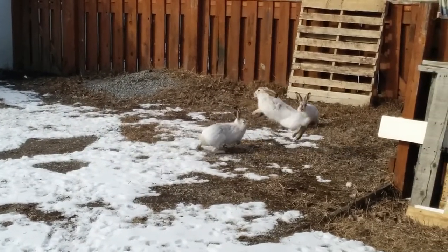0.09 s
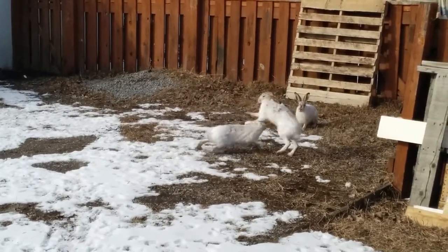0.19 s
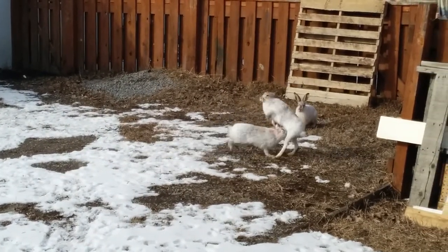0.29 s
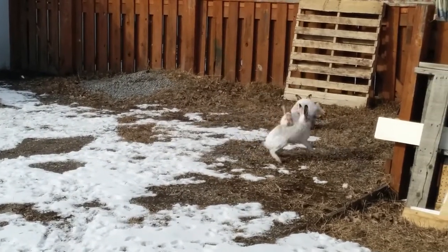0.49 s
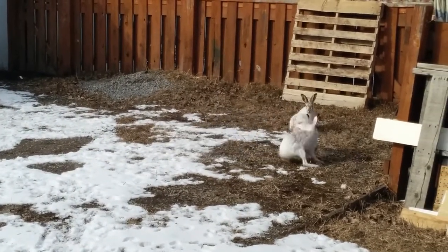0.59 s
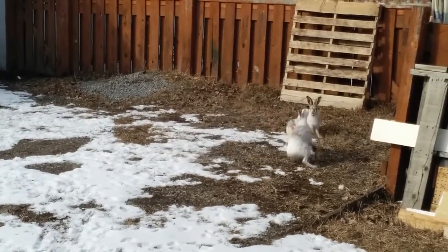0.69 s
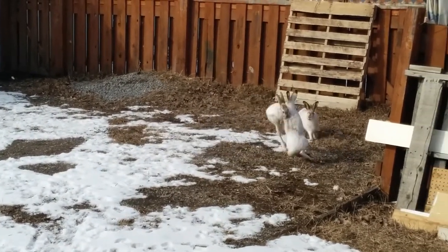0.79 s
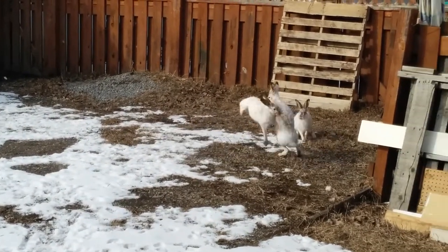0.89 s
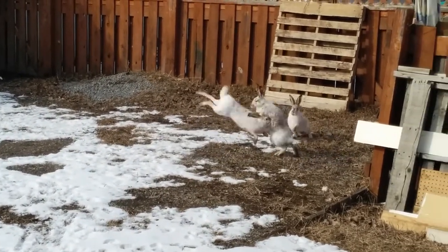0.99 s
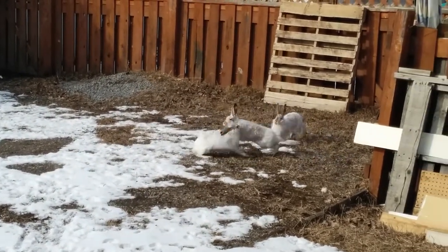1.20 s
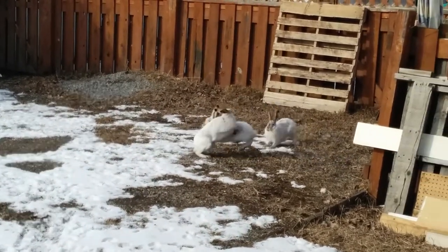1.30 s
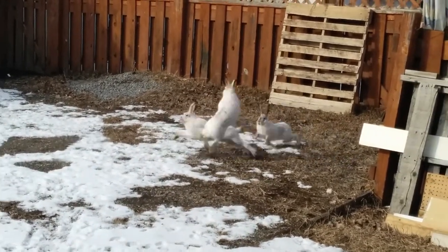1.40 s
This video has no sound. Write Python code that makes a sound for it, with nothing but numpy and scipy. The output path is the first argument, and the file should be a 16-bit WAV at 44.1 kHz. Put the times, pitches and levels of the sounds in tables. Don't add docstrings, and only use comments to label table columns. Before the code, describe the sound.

Short raspy animal grunts from fighting hares, with soft landing thumps and claw scuffs outdoors

```python
import sys
import numpy as np
from scipy import signal
from scipy.io import wavfile
from scipy.ndimage import uniform_filter1d

SR = 44100
rng = np.random.default_rng(int(sys.argv[2]) if len(sys.argv) > 2 else 0)


def ratio_of_db(decibels):
    return 10 ** (np.asarray(decibels, float) / 20)


def generate_wav(sig):
    pcm = np.round(np.clip(np.atleast_2d(sig).T, -1, 1) * 32767).astype(np.int16)
    wavfile.write(sys.argv[1], SR, pcm)


N = 63945


def evened(x):
    return x / np.sqrt(np.mean(x ** 2) + 1e-20)


def add(mix, s, sound):
    part = mix[max(round(s * SR), 0):][:len(sound)]
    part += sound[:len(part)]


def resonate(x, hz, width):
    turn = np.exp(2j * np.pi * hz * np.arange(len(x)) / SR)
    r = np.exp(-1.4 * np.pi * width / SR)
    low = x / turn
    for _ in range(3):
        low = signal.lfilter([1 - r], [1, -r], low)
    return 2 * (turn * low).real


def hush():
    # frequency in Hz, level in dB per Hz.
    air_spectrum = [(35, -34.5), (60, 4.5), (674, -3.5), (812, -0.5), (1290, -17), (3130, -16.5),
                    (4640, -28.5), (7570, -22), (15600, -24.5)]
    level_db, patch_db = -67, 1.5
    frames, hz = N // 256 + 5, np.fft.rfftfreq(1024, 1 / SR)
    a, b, patches = rng.standard_normal((frames, 513, 3)).T
    patches = uniform_filter1d(patches, 12, 0)
    patches = evened(uniform_filter1d(patches, 10, 1))
    f, db = np.transpose(air_spectrum)
    colour_db = np.interp(np.log(hz + 1), np.log(f + 1), db, left=-30)
    z = (a + 1j * b) * ratio_of_db(colour_db[:, None] + patch_db * patches)
    air = signal.istft(z, nperseg=1024, noverlap=768)[1][:N]
    return ratio_of_db(level_db) * evened(air)


def fence(x):
    t60, first_return_s, top_hz = 0.12, 0.008, 5100
    t = np.arange(8000) / SR
    taps = rng.standard_normal(8000) * ratio_of_db(-60 * t / t60) * (t > first_return_s)
    taps = signal.lfilter(*signal.butter(2, top_hz, fs=SR), taps)
    return signal.fftconvolve(x, taps / np.linalg.norm(taps))[:N]


def thumps():
    # start in seconds, peak level in dB, frequency in Hz.
    landings = [(0.0, -43, 126), (0.024, -41.5, 120), (0.042, -38.5, 180), (0.053, -34, 147),
                (0.08, -43, 110), (0.092, -45, 80), (0.21, -37.5, 71), (0.43, -47, 78), (0.663, -58, 69),
                (1.083, -53, 68.5), (1.191, -50.5, 68.6), (1.419, -67.5, 62.4)]
    decay_cycles = 0.43
    out, t = np.zeros(N), np.arange(0, .15, 1 / SR)
    for s, db, hz in landings:
        age = t * hz / decay_cycles
        push = np.e * age * np.exp(-age)
        add(out, s, ratio_of_db(db) * push * np.sin(2 * np.pi * hz * t))
    return out


def scuffs():
    # start in seconds, length in seconds, level in
    # dB, centre in Hz, width in Hz.
    scrapes = [(0.159, 0.016, -62, 1600, 900), (0.043, 0.009, -66, 2740, 400),
               (0.05, 0.035, -75, 2950, 250), (0.1, 0.022, -67, 560, 300), (0.715, 0.03, -59, 500, 600),
               (0.764, 0.13, -65, 346, 486), (0.788, 0.02, -63, 2400, 1000), (0.8, 0.09, -65, 2300, 1100),
               (0.955, 0.022, -58, 4750, 500), (0.9815, 0.0018, -53, 7550, 3500),
               (0.983, 0.012, -59, 1150, 500), (1.149, 0.0027, -62.5, 9200, 5000),
               (1.184, 0.004, -58, 7000, 3000), (1.208, 0.025, -52, 620, 450), (1.23, 0.02, -66, 750, 400),
               (1.269, 0.01, -72, 3100, 500), (1.34, 0.016, -73, 2560, 300)]
    out = np.zeros(N)
    for s, length, db, hz, width in scrapes:
        n = round(length * SR)
        grain_levels = ratio_of_db(2.5 * rng.standard_normal(60)).repeat(100)
        grains = (rng.standard_normal(6000) * grain_levels)[:n]
        add(out, s, ratio_of_db(db) * np.hanning(n) ** .5 * evened(resonate(grains, hz, width)))
    return out


def throat_rings(throat, snaps, puffs, voiced, breath, breath_top, lower_top_hz):
    puff_share, upper_hz = .22, 3900
    scatter, shimmer_db, lag_s = 1.7 * breath_top, min(4.5 * breath_top, 2), .0007
    cycle = np.cumsum(snaps > 0)
    air = voiced * puff_share * puffs + breath * rng.standard_normal(len(snaps))
    lower, upper = np.zeros((2, len(snaps)))
    for k, (hz, width, db) in enumerate(throat):
        uneven = rng.standard_normal(200)
        strike = np.sqrt(2) * voiced * snaps * np.exp(1j * scatter * uneven[cycle])
        strike = strike * ratio_of_db(shimmer_db * uneven[-1 - cycle])
        snap_share = 1 - puff_share * (1 + 2 * (hz > upper_hz))
        ring = ratio_of_db(db) * resonate(snap_share * strike + air, hz, max(width, 50))
        add(lower if hz < lower_top_hz else upper, lag_s * (k % 3), ring)
    return evened(lower), evened(upper)


def chest_hum(turns, late, hz, breath_top):
    waver_db, second_db, blur_hz = 5, -10, 178
    waver = ratio_of_db(waver_db * breath_top * np.interp(turns / 2, np.arange(200), rng.standard_normal(200)))
    second = ratio_of_db(second_db) * (1 - breath_top) ** 2 * 1.2
    tone = np.sin(2 * np.pi * late) + second * np.sin(4 * np.pi * late)
    tone = np.sqrt(2) * waver * tone
    blur = breath_top ** 1.6
    noise = evened(resonate(rng.standard_normal(len(late)), hz, blur_hz))
    return np.sqrt(1 - blur ** 2) * tone + blur * noise


def grunt(curve, throat, breath_top, gruff_db, lower_top_hz=3900):
    jitter, shimmer_db, puff_cycle = .02, 1.2, .25
    breath_per_db, fade_s = .055, 0.0046
    s, hum_db, hz, rasp_db, open_db = np.transpose(curve)
    t = np.arange(s[0], s[-1], 1 / SR)

    turns = np.cumsum(np.interp(t, s, hz)) / SR
    late = turns + jitter * np.interp(turns, np.arange(200), rng.standard_normal(200))
    cycle = np.floor(np.maximum.accumulate(np.abs(late))).astype(int)
    snaps = evened(np.diff(cycle, prepend=0))
    puffs = evened(np.exp(-(late % 1) / puff_cycle) * rng.standard_normal(len(t)))

    effort_db = np.interp(t, s, rasp_db)
    slack_db = (rasp_db.max() - effort_db - 6).clip(0)
    breath = np.clip(breath_top + breath_per_db * slack_db, 0, .95)
    voiced = np.sqrt(1 - breath ** 2) * ratio_of_db(shimmer_db * rng.standard_normal(200)[cycle])
    lower, upper = throat_rings(throat, snaps, puffs, voiced, breath, breath_top, lower_top_hz)
    rasp = ratio_of_db(effort_db) * lower + ratio_of_db(np.interp(t, s, hum_db + open_db)) * upper

    hum = chest_hum(turns, late, hz.mean(), breath_top)
    gruff = evened(resonate(voiced * snaps + rng.standard_normal(len(t)), 554, 554))
    chest_low_cut = signal.butter(3, 144, "high", fs=SR, output="sos")
    chest = signal.sosfilt(chest_low_cut, hum + ratio_of_db(gruff_db) * gruff)
    rumble = ratio_of_db(-26.5) * evened(resonate(rng.standard_normal(len(t)), 90, 150))

    since_start = t - s[0] + (s[0] == 0)
    edge = np.minimum(np.minimum(since_start, s[-1] - t) / fade_s, 1)
    return s[0], edge * (ratio_of_db(np.interp(t, s, hum_db)) * (chest + rumble) - rasp)


def scene():
    # time in seconds, chest hum in dB, pitch in Hz, rasp in dB,
    # mouth opening as upper resonances over the hum in dB.
    fading = [(0.0, -41, 164.8, -37.5, -29), (0.03, -48.5, 150.5, -77.5, -33), (0.05, -48, 155.6, -90, -32),
              (0.09, -55, 140, -98, -36), (0.112, -57, 153, -94, -41), (0.125, -70, 146, -92, -25)]
    first = [(0.156, -76, 308.5, -78, -31), (0.16, -72, 305.6, -77, -43), (0.18, -45, 303.1, -45.5, -21),
             (0.2, -42, 301.3, -46.5, -18.5), (0.234, -43.5, 277.5, -51.5, -18.5),
             (0.282, -44.5, 183.7, -44.5, -22), (0.31, -41.5, 176.7, -49.5, -35),
             (0.334, -56.5, 178, -65, -45), (0.37, -56.5, 177, -69, -38)]
    onset = [(0.396, -65, 313.2, -51, -30), (0.406, -63, 325, -47, -8), (0.424, -44, 324.4, -38.5, -3.5),
             (0.434, -49.5, 296.8, -40, 0.5), (0.442, -42, 242.5, -39, -8.5),
             (0.456, -40.5, 245.3, -34.5, -1.5), (0.472, -41, 243.3, -30, 0), (0.478, -37, 244, -42, -5.5),
             (0.486, -36.5, 243, -52.5, -1)]
    loud_grunt = [(0.478, -47.5, 245.9, -46, -10.5), (0.488, -38.5, 242.7, -33.5, -5),
                  (0.506, -34, 245.5, -30, -6.5), (0.528, -35.5, 256, -29, 2.5),
                  (0.54, -46.5, 266, -28, 11.5), (0.554, -35.5, 238.9, -30, 1.5),
                  (0.572, -37, 236.8, -36, 1), (0.584, -44.5, 245.6, -40, -13.5), (0.6, -44, 231, -53, -15)]
    trail = [(0.584, -43, 227.1, -40.5, -4), (0.614, -53, 203.2, -43.5, -3), (0.63, -44, 196.8, -45.5, -3),
             (0.655, -53, 200, -58.5, -8)]
    mutter = [(0.648, -62, 196.3, -53, -12), (0.664, -42.5, 200.1, -54, -11.5),
              (0.676, -45.5, 201.1, -73, -21), (0.694, -39.5, 196.7, -58, -26),
              (0.702, -47, 197.4, -68, -37), (0.718, -60, 195.9, -88, -26), (0.734, -54, 200.5, -57, -19.5),
              (0.755, -64, 213, -71, -18)]
    huff = [(0.884, -68, 232.2, -51, -33), (0.897, -56, 229, -49, -20), (0.91, -57, 241, -38.5, -17),
            (0.92, -70, 232, -47, -5)]
    short_grunt = [(0.911, -62, 228, -51, -24), (0.918, -43.5, 232.4, -35, -7),
                   (0.928, -38, 236.9, -38, -6), (0.948, -46, 235, -36.5, 5.5),
                   (0.958, -47.5, 226.6, -43, -6), (0.972, -51.5, 213, -54, -14), (0.995, -71, 230, -61, 3)]
    after = [(1.0, -59, 182, -52, -7), (1.006, -52, 180.7, -50.5, -12), (1.018, -55.5, 176, -55, -24.5),
             (1.024, -46, 173.2, -64, -27), (1.05, -62, 175, -80, -17)]
    falling = [(1.068, -86, 396, -73, -3), (1.08, -44.5, 389, -40.5, -23.5), (1.095, -45, 339, -37, -21),
               (1.112, -43, 298.1, -44, -26), (1.124, -41.5, 298.5, -45, -30), (1.15, -50, 290, -60, -25)]
    second_grunt = [(1.135, -44, 236.1, -34, -20), (1.147, -52.5, 230.2, -51, -34),
                    (1.171, -36.5, 230.9, -42.5, -27), (1.189, -48.5, 234.8, -40, -20),
                    (1.205, -42, 234.4, -40, -25), (1.215, -51, 238, -59, -24), (1.24, -75, 254, -85, -13)]
    last = [(1.298, -79, 222.5, -72, -21), (1.31, -50, 225.4, -66, -22), (1.321, -54.5, 222.5, -56.5, -27),
            (1.335, -56, 211.5, -69, -26), (1.37, -68.5, 211, -100, -32)]
    # frequency in Hz, width in Hz, level in dB.
    small_mouth = [(960, 960, 1), (2790, 1530, -4), (7940, 4100, -21.5)]
    narrow_mouth = [(1372, 96, -5), (1730, 740, -11.5), (2905, 630, -15.5), (3516, 190, -17),
                    (5090, 550, -9), (7400, 4600, -24.5)]
    opening_mouth = [(1250, 410, 2.5), (1893, 420, -2), (2825, 610, 4.5), (4200, 1000, 3),
                     (6070, 700, -1.5), (7600, 970, -9), (11200, 4100, -22.5)]
    wide_mouth = [(1458, 670, 4), (2945, 660, 7), (4250, 1250, 2), (6090, 1200, -0.5), (7760, 1280, -4.5),
                  (9470, 5200, -18), (10800, 3500, -18), (14600, 1700, -42)]
    slack_mouth = [(1360, 800, 5.5), (1940, 580, 3), (3150, 1550, 2), (4540, 820, 5.5), (6600, 800, 0.5),
                   (7300, 1700, -10), (11600, 2900, -20.5)]
    snap_mouth = [(1950, 1270, 7), (2880, 425, 5.5), (4080, 1350, -11), (6270, 890, -11),
                  (8040, 1300, -19.5), (11050, 1100, -25.5), (14070, 2400, -33)]
    dull_mouth = [(1400, 550, 2), (1980, 1200, -3), (3330, 520, -11.5), (4120, 610, -10), (7000, 5100, -32)]
    round_mouth = [(585, 380, 11.5), (1495, 230, 11), (1950, 560, 10.5), (2700, 590, 5), (6400, 4200, -25)]
    pinched_mouth = [(900, 350, -7.5), (1470, 820, -13), (2900, 300, 1), (3460, 430, 1),
                     (7650, 5200, -21.5)]
    firm, clear, hoarse, airy = .24, .34, .6, .85
    echo_db = -21

    hares = np.zeros(N)
    # course, throat, breathiness, gruffness in dB (and top of the lower resonances in Hz)
    for voice in [(fading, small_mouth, hoarse, -22),
                  (first, narrow_mouth, hoarse, -14),
                  (onset, opening_mouth, clear, -9),
                  (loud_grunt, wide_mouth, firm, -15),
                  (trail, slack_mouth, airy, -6),
                  (mutter, snap_mouth, hoarse, -12),
                  (huff, snap_mouth, airy, -11),
                  (short_grunt, snap_mouth, firm, -11),
                  (after, dull_mouth, hoarse, -14, 5000),
                  (falling, dull_mouth, hoarse, -8, 5000),
                  (second_grunt, round_mouth, firm, -8),
                  (last, pinched_mouth, airy, -9)]:
        add(hares, *grunt(*voice))
    echo = ratio_of_db(echo_db) * fence(hares)
    return (hares + echo + thumps() + scuffs() + hush())[None]


def top_cut(x):
    return signal.sosfilt(signal.butter(12, 15710, fs=SR, output="sos"), x)


def record(dry):
    low_pass = signal.firwin(301, 15750, fs=SR)
    mix = signal.oaconvolve(dry, low_pass[None], "same")
    return top_cut(mix)


dry = scene()
out = record(dry)
generate_wav(out)
```